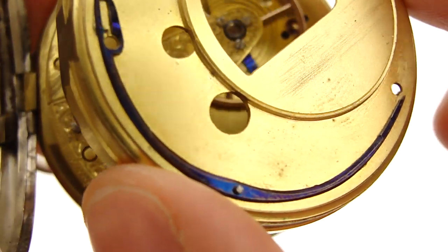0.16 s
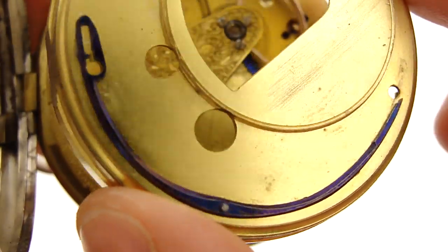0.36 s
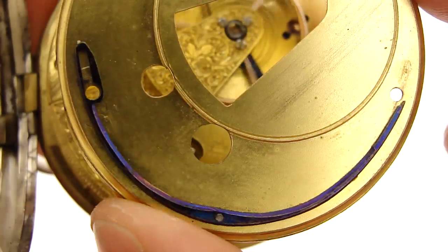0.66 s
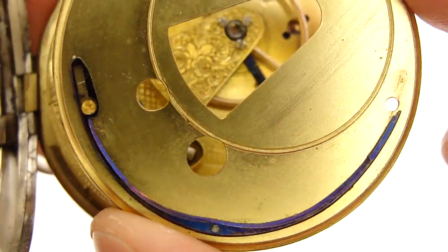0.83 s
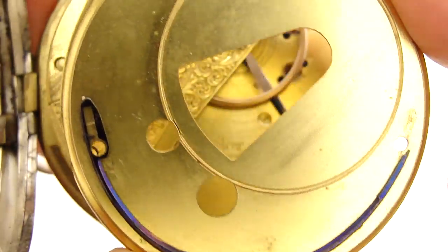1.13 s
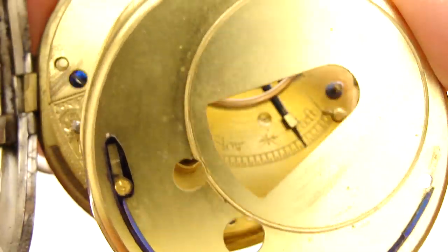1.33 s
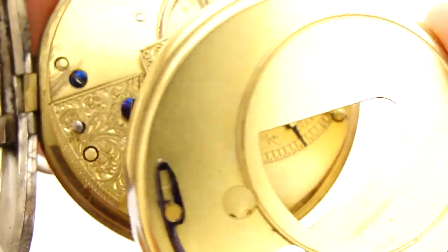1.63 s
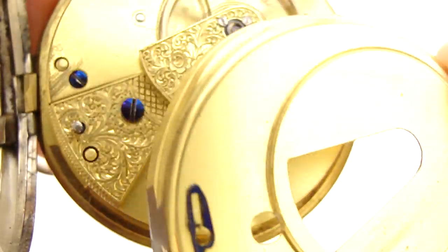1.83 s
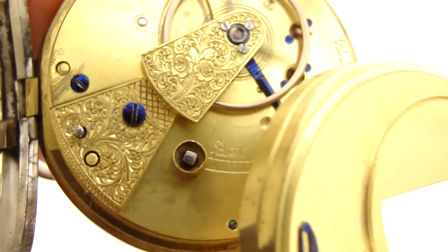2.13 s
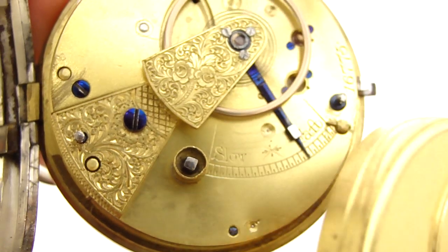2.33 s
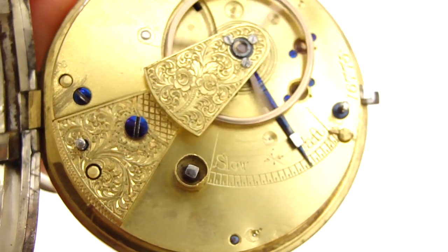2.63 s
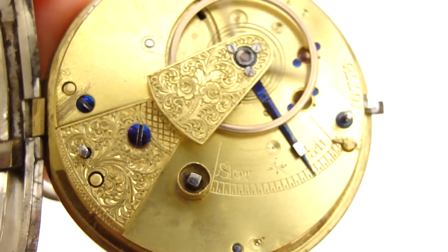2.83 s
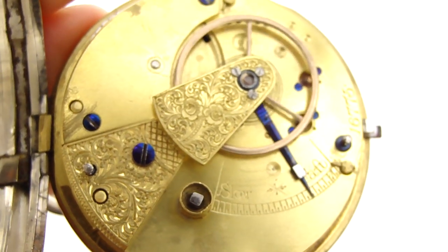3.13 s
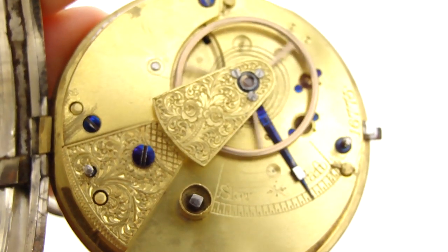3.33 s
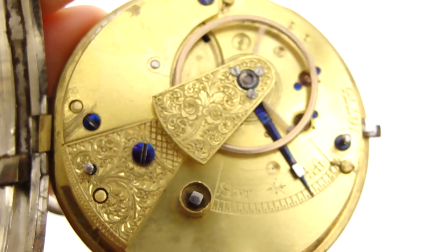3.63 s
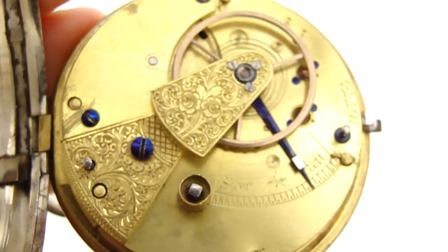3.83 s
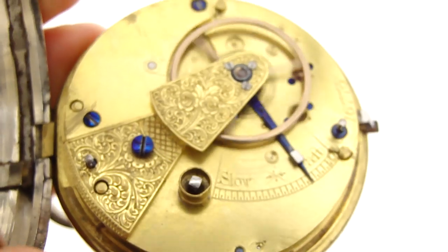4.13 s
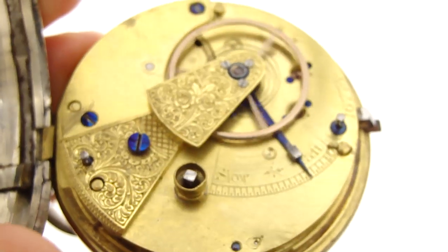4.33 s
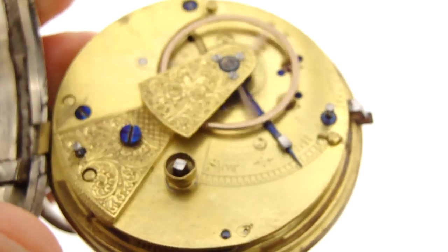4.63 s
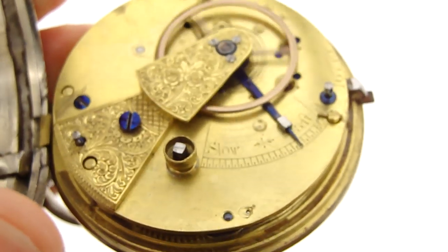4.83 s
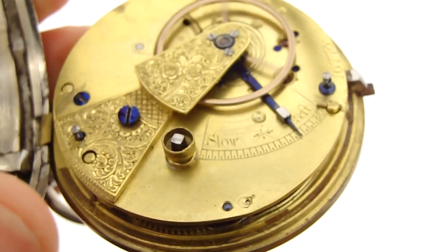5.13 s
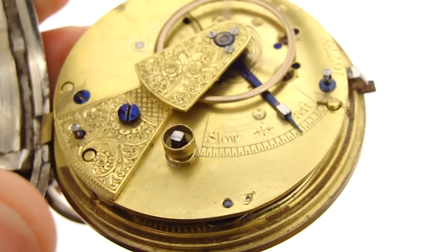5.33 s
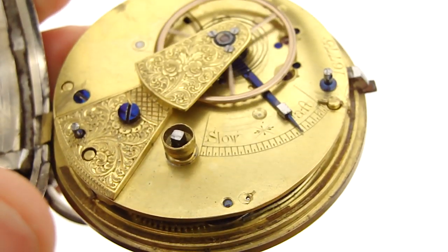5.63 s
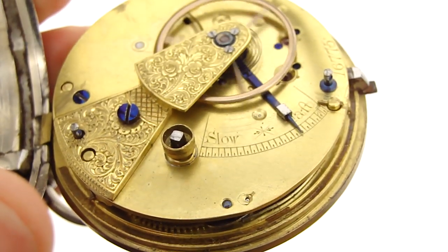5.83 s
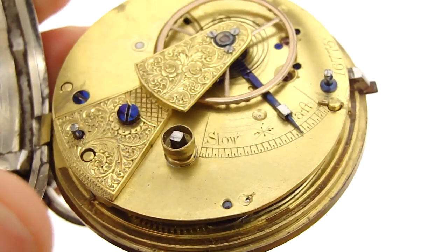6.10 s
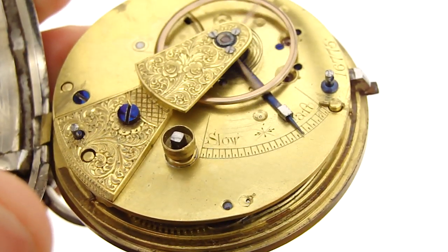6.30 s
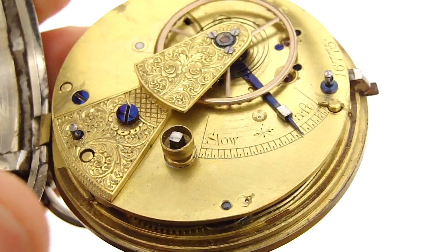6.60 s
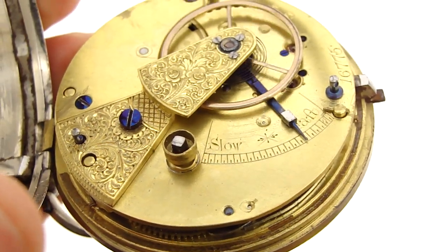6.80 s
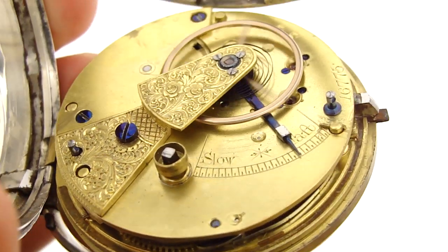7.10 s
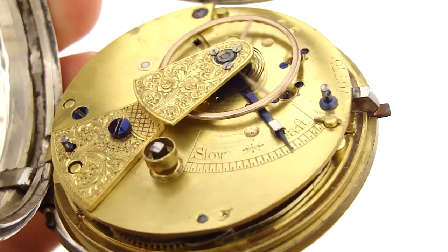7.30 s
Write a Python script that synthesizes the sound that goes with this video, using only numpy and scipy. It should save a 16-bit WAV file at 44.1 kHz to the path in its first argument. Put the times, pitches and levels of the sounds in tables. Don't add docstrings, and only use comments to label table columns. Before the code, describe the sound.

Hard, bright metallic ticks from a pocket watch movement, over four a second, above soft hiss, with light handling sounds and distant clock tocks.

```python
import sys
import numpy as np
from scipy import signal
from scipy.fft import rfft, irfft, next_fast_len
from scipy.io import wavfile
from scipy.ndimage import uniform_filter1d, map_coordinates

SR = 44100
rng = np.random.default_rng(int(sys.argv[2]) if len(sys.argv) > 2 else 0)


def to_wav(s):
    ch = np.atleast_2d(s).T
    pcm = np.round(np.clip(ch, -1, 1) * 32767)
    wavfile.write(sys.argv[1], SR, pcm.astype(np.int16))


def decibels_to_gain(level_db):
    exponent = np.asarray(level_db, float) / 20
    return 10 ** exponent


N = 328986

# tooth drop in seconds, then levels of drop, lower bridge modes, impulse
# and first rebound in dB.
ENTRY_BEATS = [(.1226, -26, -1.5, -58, -31), (.5807, -22, -15, -56, -30), (1.0397, -21.5, -8, -55, -32.5),
               (1.498, -23, -21, -51, -30.5), (1.9574, -19, -11, -57, -36), (2.4154, -19, -6, -50, -32),
               (2.8736, -19.5, -5.5, -50, -34), (3.3328, -20, -20, -53, -32.5),
               (3.791, -22, -1, -46.5, -30), (4.2501, -20.5, 0, -48, -31.5), (4.7076, -21.5, 0, -54, -34.5),
               (5.1671, -24.5, -3, -51, -36), (5.6255, -23.5, -7, -51, -38), (6.0836, -23, -7, -51, -33.5),
               (6.5418, -22.5, -14, -53, -32), (7.0, -26.5, -1.5, -49, -31.5), (7.4591, -32, -5, -64, -35)]
# as for the entry pallet, in seconds and dB.
EXIT_BEATS = [(.3615, -19.5, -10, -48, -31.5), (.82, -19.5, -24, -48, -35), (1.279, -24, -7, -50, -29.5),
              (1.7376, -17.5, -8, -47, -46), (2.1957, -23, -6, -50, -31), (2.6542, -20, -4.5, -48, -48),
              (3.1135, -18, -22, -47, -29), (3.5713, -20.5, -5, -42, -31), (4.0314, -23, 1.5, -48, -27.5),
              (4.4884, -22, -1, -54, -33.5), (4.9465, -23.5, -1, -53, -31.5), (5.404, -20, -4, -49, -45),
              (5.8627, -22.5, -2.5, -53, -37), (6.3207, -22, -.5, -49, -43),
              (6.7798, -22.5, -7, -42.5, -42), (7.2391, -22, -6, -51, -36)]
# unlock and impulse lead the drop, the first rebound follows it, in seconds;
# then the strengths of the parts in each contact, in dB.
ENTRY_PALLET = dict(unlock_s=0.029, impulse_s=.0188, flight_s=0.0039, unlock_db=-54.5, unlock_lower_db=-4.5, unlock_bright_db=3.5, impulse_bright_db=-1.5, bright_db=-13.5, plate_db=-22, band_db=-22, long_db=[-57, -56, -62])
EXIT_PALLET = dict(unlock_s=0.036, impulse_s=.0225, flight_s=0.0025, unlock_db=-57.5, unlock_lower_db=3.5, unlock_bright_db=-1, impulse_bright_db=-11, bright_db=-17.5, plate_db=-14, band_db=-19, long_db=[-60, -65, -59])
# time in seconds, gain in dB of the unlock and of the drop's
FACING = [
    (0, 0),
    (2.5, 1.5),
    (3.5, 0),
    (5.2, 6),
    (7.46, 3),
]
# frequency in Hz, level in dB, t60 in seconds.
UPPER_BRIDGE = [(6390, -6, 0.022), (6530, -2, 0.013), (6630, -13.5, 0.015), (6800, -11.5, 0.017),
                (7700, -29, 0.012)]
# frequency in Hz, level in dB, t60 in seconds.
LOWER_BRIDGE = [(5140, -13.5, 0.017), (5860, 0, 0.022), (5950, 1.5, 0.011), (5914, -7, 0.023)]
# frequency in Hz, level in dB, t60 in seconds.
BRIGHT_STEEL = [(7860, -3, 0.038), (8650, 5.5, 0.019), (8980, 6.5, 0.0083), (9440, -4, .008),
                (10050, 1.5, 0.024), (10580, -7, 0.025), (10780, 5, 0.016)]
# frequency in Hz, level in dB, t60 in seconds.
BRASS_PLATE = [(2584, 6, 0.028), (2940, -4, 0.026)]
# frequency in Hz, level in dB, t60 in seconds.
MIDDLE_BAND = [(3330, -12.5, 0.028), (3780, -14.5, 0.035), (3940, -24, 0.0082), (4255, 2.5, 0.009),
               (4460, 0, 0.0074)]
# frequency in Hz, t60 in seconds.
LONG_MODES = [(4312, 0.068), (6300, 0.039), (6630, 0.071)]
# time in seconds, frequency in Hz, level in dB.
SINGING_DROPS = [(.123, 6300, -51), (.581, 6630, -45), (0.822, 6630, -44), (1.04, 6630, -43),
                 (1.498, 6300, -49), (1.738, 6300, -51), (1.958, 4312, -49), (2.416, 6630, -42),
                 (2.655, 6630, -44), (3.114, 6630, -43), (3.333, 6630, -44), (3.333, 4312, -47.5),
                 (3.571, 6630, -46), (3.571, 4312, -47), (3.791, 4312, -50), (4.028, 6630, -40),
                 (4.03, 4312, -51), (4.25, 6300, -38), (4.489, 6300, -38), (4.489, 4312, -51),
                 (4.709, 4312, -47), (5.167, 6300, -52), (5.404, 6630, -49), (5.624, 4312, -42),
                 (6.084, 4312, -55), (6.084, 6300, -47), (6.084, 6630, -47), (6.543, 4312, -47),
                 (6.543, 6630, -41), (6.78, 6630, -50)]
# frequency in Hz, spectral density in dB per Hz.
CRACK_SPECTRUM = [(1500, -40), (2500, 3), (4500, -4), (8000, -9), (11000, -8)]

# time in seconds, level in dB, t60 in seconds.
SNAPS = [
    (4.4032, -30, 0.021),
]
# frequency in Hz, spectral density in dB per Hz.
SNAP_SPECTRUM = [(180, -45), (300, -18), (1590, 1), (2740, -8.5), (4240, -1), (4850, -21), (6080, -6.5),
                 (6660, -17), (8100, -14), (10900, -30), (14200, -54), (22000, -120)]
# frequency in Hz, level in dB, t60 in seconds.
KNUCKLE_MODES = [(284, -10.5, 0.055), (477, -12, 0.034), (753, -13.5, 0.1), (1030, -1, 0.03),
                 (1680, -1, 0.049), (1360, -2, .03), (2420, -23, .02), (3450, -3, .018), (4460, -5, 0.014),
                 (5000, -8, .012), (6010, -9, 0.026)]
# time in seconds, peak level in dB.
NAIL_TAPS = [
    (0.5305, -49),
    (2.266, -39.5),
    (3.2334, -50),
]
# frequency in Hz, level in dB, t60 in seconds.
LID_MODES = [(2350, -7, .012), (2990, -4, 0.016), (3620, -11, 0.008), (4280, 3, 0.0069), (5000, -17, .007)]
# start, firmest moment and end in seconds, level in dB.
LID_SLIDES = [
    (.3, .45, 1.3, -65),
    (1.2, 1.42, 1.9, -63),
]
# frequency in Hz, level in dB, t60 in seconds.
CREAK_MODES = [(1900, -6, .02), (2650, 0, .04), (3500, -7, .02)]

# frequency in Hz, width in Hz, level in dB.
CLOCK_RESONANCES = [(780, 190, -6.5), (1043, 105, 3.5), (1260, 340, -4.5), (1780, 99, -2),
                    (2400, 470, -6.5)]
# frequency in Hz, level in dB, t60 in seconds.
CLOCK_KNOCK = [(800, -2, .07), (960, 0, .07)]
# frequency in Hz, spectral density in dB per Hz.
HISS_SPECTRUM = [(15, -63), (25, -25), (229, -5), (266, -4.5), (335, -4.5), (503, -5), (586, -3), (756, -6),
                 (816, -5), (1200, -7.5), (1620, -7), (2630, -12.5), (6580, -17), (7860, -18.5),
                 (10900, -20), (14200, -76), (22000, -120)]
# frequency in Hz, level in dB.
MAINS_HUM = [(240, -71), (480, -72.5), (600, -74.5), (897, -74), (1080, -71.5), (1701, -71)]
# on and off in seconds, level in dB.
CAMERA_DRIVE = [
    (-.1, 0.574, -66),
    (2.24, 3.25, -65.3),
]

SHRINK, LOSS_DB = 0.79, 5.5
SLACK_S, COLOUR_DB, LONG_DB = .0005, 1.5, 3
CRACK_T60_S = .012
CREAK_S, SLIP_S, SLIPS, CREAK_DB = 7.273, .016, 7, -52
RUB_FADE_DB = 26
CLOCK_S, CLOCK_PERIOD_S = .955, 1.0
CLOCK_DB, CLOCK_KNOCK_DB = -52, -44
AIR_DB = -54
DRIVE_EDGE_S = 0.037
TOP_HZ = 10955
CAMERA_HZ = 24000
IMAGE_DB, IMAGE_HZ, IMAGE_WIDTH_HZ = -29, 13100, 220
IMAGE_GATE_DB, IMAGE_GATE_S = -101.5, .025


def escapement():
    out = np.zeros(N + SR)
    for rows, pallet in ((ENTRY_BEATS, ENTRY_PALLET), (EXIT_BEATS, EXIT_PALLET)):
        for row in rows:
            add(out, *beat(row, pallet))
    for s, hz, db in SINGING_DROPS:
        nearest = min(LONG_MODES, key=lambda mode: abs(mode[0] - hz))
        tone = ring([(hz, db, nearest[1])], scatter_db=0.5, attack=0.0032, detune=0.0013)
        add(out, s, decibels_to_gain(4.5) * tone)
    return out[:N]


def beat(row, pallet):
    s, drop_db, lower_db, impulse_db, rebound_db = row
    luck = rng.standard_normal(12)
    late = SLACK_S * luck[:4]
    facing_db = np.interp(s, *np.transpose(FACING))
    drop = .05
    out = np.zeros(SR // 4)

    colour_db = np.array([pallet["bright_db"], pallet["plate_db"], pallet["band_db"]])
    colour_db = colour_db + facing_db + COLOUR_DB * luck[4:7]
    add(out, drop, decibels_to_gain(drop_db - 7.0) * (contact(lower_db, *colour_db) + crack(db=-19.5)))

    first = drop + pallet["flight_s"] + late[0]
    second = first + SHRINK * pallet["flight_s"] + late[1]
    rebound = contact(-0.66, bright_db=-8.5, plate_db=-13, band_db=-8.5)
    add(out, first, decibels_to_gain(rebound_db - 5.5) * rebound)
    rebound = contact(-13, bright_db=-13.5, plate_db=-8.5, band_db=-8.5)
    add(out, second, decibels_to_gain(rebound_db - LOSS_DB - 1.0) * rebound)

    levels_db = np.array(pallet["long_db"]) + facing_db + LONG_DB * luck[7:10]
    modes = [(hz, db, t60) for (hz, t60), db in zip(LONG_MODES, levels_db)]
    add(out, drop, decibels_to_gain(7.5) * ring(modes, scatter_db=0, attack=0.0053, detune=0.0024))

    bright_db = pallet["unlock_bright_db"] + COLOUR_DB * luck[10]
    unlock = contact(pallet["unlock_lower_db"], bright_db, plate_db=-17, band_db=-6)
    add(out, drop - pallet["unlock_s"] + late[2], decibels_to_gain(pallet["unlock_db"] + facing_db + 3.5) * unlock)

    bright_db = pallet["impulse_bright_db"] + COLOUR_DB * luck[11]
    impulse = contact(-2.5, bright_db, plate_db=-13, band_db=-10)
    add(out, drop - pallet["impulse_s"] + late[3], decibels_to_gain(impulse_db + 3.5) * impulse)
    return s - drop, out


def contact(lower_db, bright_db, plate_db, band_db):
    upper = blow(UPPER_BRIDGE, scatter_db=3.5, attack=0.00039, detune=0.0027)
    lower = decibels_to_gain(lower_db + 0.54) * blow(LOWER_BRIDGE, scatter_db=4.5, attack=0.00043, detune=0.015)
    steel = decibels_to_gain(bright_db + 4.0) * blow(BRIGHT_STEEL, scatter_db=3.5, attack=0.0001, detune=0.025)
    brass = decibels_to_gain(plate_db - 4.5) * blow(BRASS_PLATE, scatter_db=-6, attack=0.00038, detune=.012)
    middle = decibels_to_gain(band_db + 1.6) * blow(MIDDLE_BAND, scatter_db=4, attack=0.00013, detune=0.026)
    return upper + lower + steel + brass + middle


def crack(db):
    t = np.arange(SR // 8) / SR
    noise = unit(filtered(rng.standard_normal(len(t)), lambda hz: decibels_to_gain(along(CRACK_SPECTRUM, hz))))
    return decibels_to_gain(db - 60 * t / CRACK_T60_S) * noise


def blow(modes, scatter_db, attack, detune):
    sound = ring(modes, scatter_db, attack, detune)
    return sound / abs(sound).max()


def ring(modes, scatter_db, attack, detune=0.0048):
    t = np.arange(SR // 8) / SR
    hz, db, t60 = np.transpose(modes)[:, :, None]
    luck = rng.standard_normal((3, len(modes), 1))
    decay = decibels_to_gain(db + scatter_db * luck[0] - 60 * t / t60)
    phase = 2 * np.pi * hz * (1 + detune * luck[1]) * t + 1.38 * luck[2]
    return (decay * np.sin(phase)).sum(0) * (1 - np.exp(-t / attack)) ** 2


def handling():
    return joint_snap() + nail_taps() + case_creak() + lid_slide()


def joint_snap():
    out, t = np.zeros(N + SR), np.arange(SR // 8) / SR
    for s, db, t60 in SNAPS:
        noise = unit(filtered(rng.standard_normal(len(t)), lambda hz: decibels_to_gain(along(SNAP_SPECTRUM, hz))))
        crackle = noise * decibels_to_gain(-60 * np.maximum(t - .003, 0) / t60) * (1 - np.exp(-t / 0.00024))
        knuckle = decibels_to_gain(-1) * ring(KNUCKLE_MODES, scatter_db=-0.5, attack=0.0026)
        add(out, s, decibels_to_gain(db) * (crackle + knuckle))
    return out[:N]


def nail_taps():
    out = np.zeros(N + SR)
    for s, db in NAIL_TAPS:
        lid = blow(LID_MODES, scatter_db=-2.5, attack=0.00023, detune=0.017)
        add(out, s, decibels_to_gain(db + 4) * (lid + crack(db=-8)))
    return out[:N]


def case_creak():
    out = np.zeros(N + SR)
    for k, (late, size) in enumerate(rng.standard_normal((SLIPS, 2))):
        slip = decibels_to_gain(CREAK_DB + 1.5 * size) * ring(CREAK_MODES, scatter_db=1.5, attack=.001)
        add(out, CREAK_S + SLIP_S * (k + .1 * late), slip)
    return out[:N]


def lid_slide():
    t = np.arange(N) / SR
    pressure = np.zeros(N)
    for on, firm, off, db in LID_SLIDES:
        pressure += decibels_to_gain(db + np.interp(t, [on, firm, off], [-RUB_FADE_DB, 0, -RUB_FADE_DB], -60, -60))
    hiss = filtered(rng.standard_normal(N), lambda hz: np.exp(-((hz - 6780) / 210) ** 2))
    return pressure * decibels_to_gain(5.9 * wobble(21.1)) * unit(hiss)


def clock():
    out, t = np.zeros(N + SR), np.arange(SR // 4) / SR
    for s in np.arange(CLOCK_S, N / SR, CLOCK_PERIOD_S):
        puff = unit(filtered(rng.standard_normal(len(t)), case_response))
        add(out, s, decibels_to_gain(CLOCK_DB - 60 * t / 0.35) * (1 - np.exp(-t / 0.00057)) * puff)
        add(out, s, decibels_to_gain(CLOCK_KNOCK_DB) * ring(CLOCK_KNOCK, scatter_db=3.5, attack=0.0038, detune=.05))
    return out[:N]


def case_response(hz):
    total = 0
    for k, (centre, width, db) in enumerate(CLOCK_RESONANCES):
        damping = 1j * hz * width
        total = total + (-1) ** k * decibels_to_gain(db) * damping / (centre * centre - hz * hz + damping)
    return total


def background():
    return mains_hum() + camera_drive() + air_hiss()


def mains_hum():
    t = np.arange(N) / SR
    drift = np.cumsum(rng.standard_normal((len(MAINS_HUM), N)), axis=1) * 1.6e-5
    out = np.zeros(N)
    for (hz, db), turn in zip(MAINS_HUM, drift):
        out += decibels_to_gain(db + 3.5 + 1.3 * wobble(4.6)) * np.sin(hz * (2 * np.pi * t + turn))
    return out


def camera_drive():
    t = np.arange(N) / SR
    running = np.zeros(N)
    for on, off, db in CAMERA_DRIVE:
        running += decibels_to_gain(db) * np.clip(np.minimum(t - on, off - t) / DRIVE_EDGE_S, 0, 1)
    hiss = filtered(rng.standard_normal(N), lambda hz: np.exp(-((hz - 10900) / 550) ** 2))
    return running * decibels_to_gain(1.5 * wobble(14)) * unit(hiss)


def air_hiss():
    noise = filtered(rng.standard_normal(N), lambda hz: decibels_to_gain(along(HISS_SPECTRUM, hz)))
    return decibels_to_gain(AIR_DB + 1.34) * unit(noise)


def wobble(rate):
    knots = rng.standard_normal(int(N * rate / SR) + 4)
    return map_coordinates(knots, [np.arange(N) * rate / SR])


def filtered(x, response):
    m = next_fast_len(len(x) + 8192)
    return irfft(rfft(x, m) * response(np.fft.rfftfreq(m, 1 / SR)), m)[:len(x)]


def along(points, hz):
    f, db = np.transpose(points)
    return np.interp(np.log(hz + 1), np.log(f + 1), db)


def unit(x):
    return x / np.sqrt(np.mean(x ** 2) + 1e-20)


def add(track, s, sound):
    track[round(s * SR):][:len(sound)] += sound


def scene():
    return (escapement() + handling() + clock() + background())[None]


def top_cut(x):
    return signal.sosfilt(signal.butter(12, 13550, fs=SR, output="sos"), x)


def record(dry):
    limited = filtered(dry[0], lambda hz: decibels_to_gain(-np.clip((hz - TOP_HZ) * 0.085, 0, 70)))
    mirror = dry[0] * np.cos(2 * np.pi * CAMERA_HZ * np.arange(N) / SR)
    leak = lambda hz: decibels_to_gain(IMAGE_DB) * np.exp(-((hz - IMAGE_HZ) / IMAGE_WIDTH_HZ) ** 2)
    image = filtered(mirror, leak)
    power = uniform_filter1d(image ** 2, round(IMAGE_GATE_S * SR))
    image = image * (power > decibels_to_gain(2 * IMAGE_GATE_DB))
    return top_cut((limited + image)[None])


dry = scene()
out = record(dry)
to_wav(out)
```